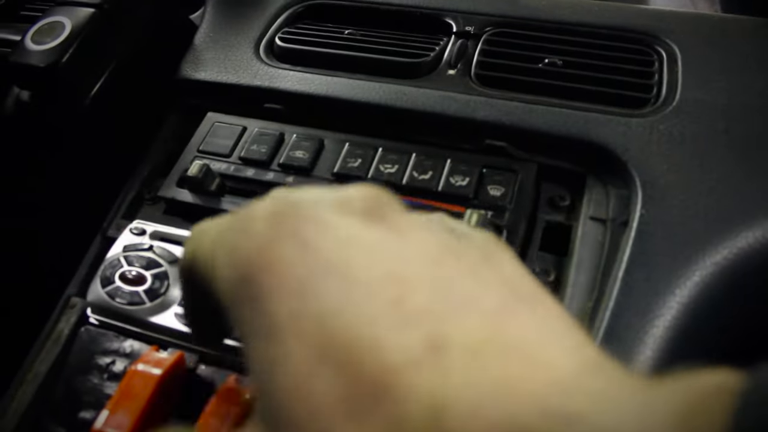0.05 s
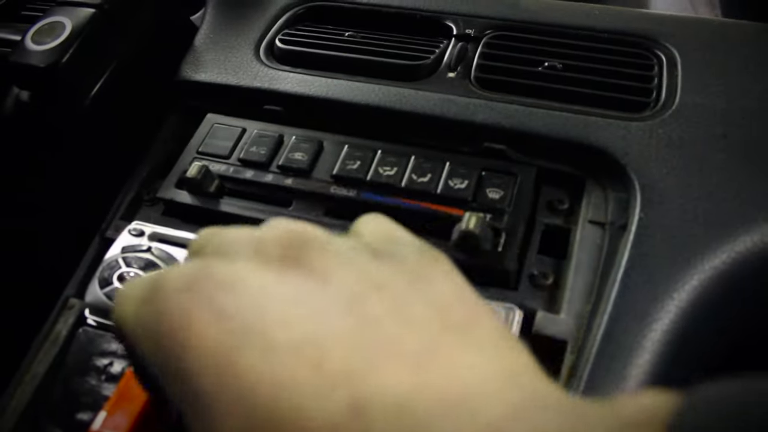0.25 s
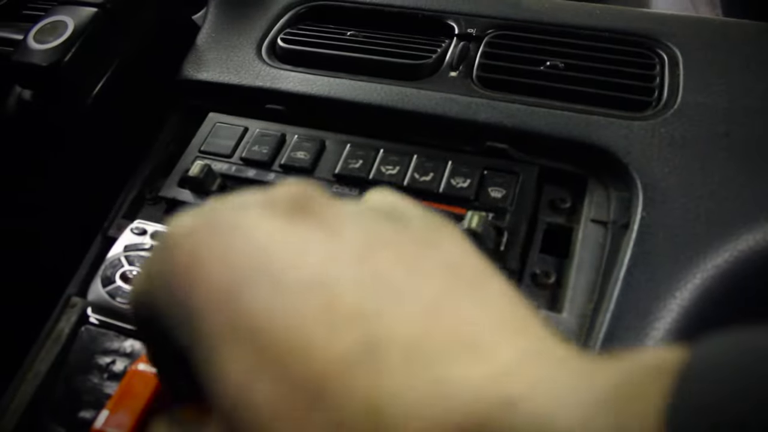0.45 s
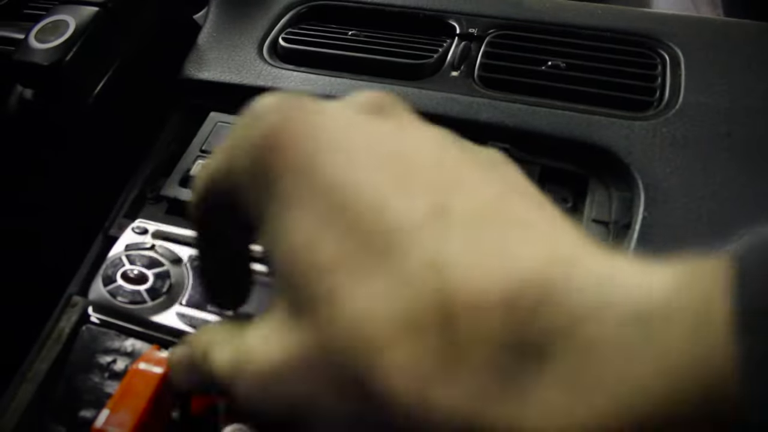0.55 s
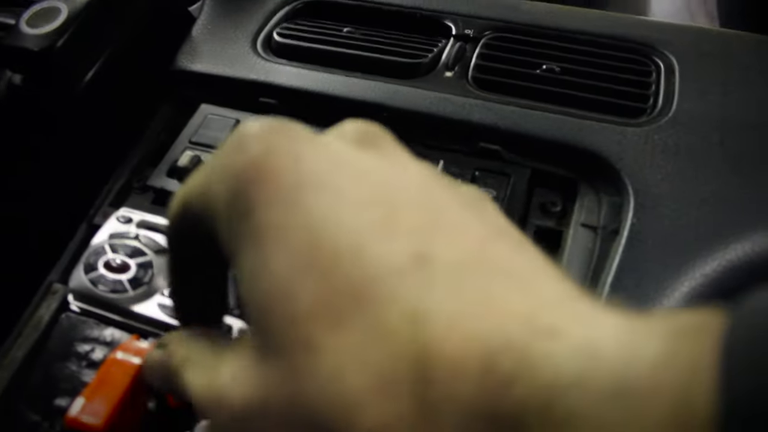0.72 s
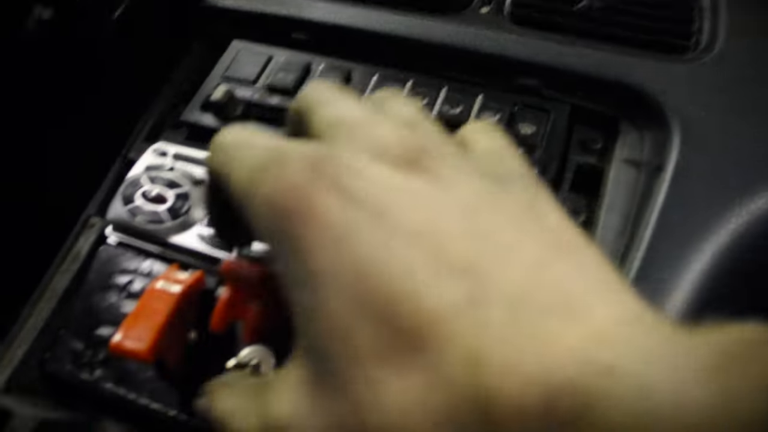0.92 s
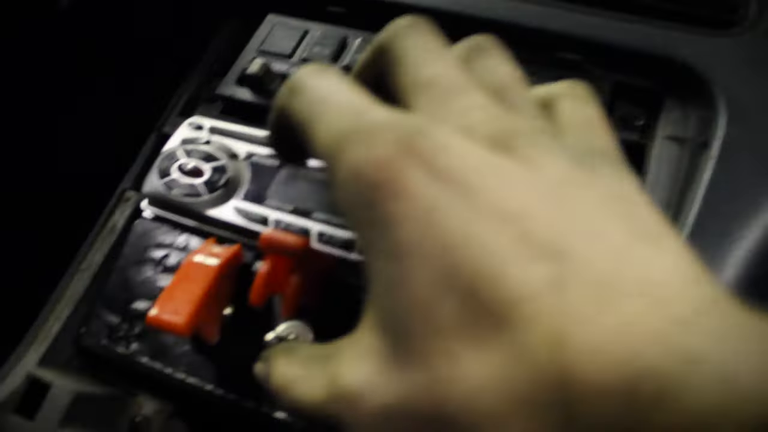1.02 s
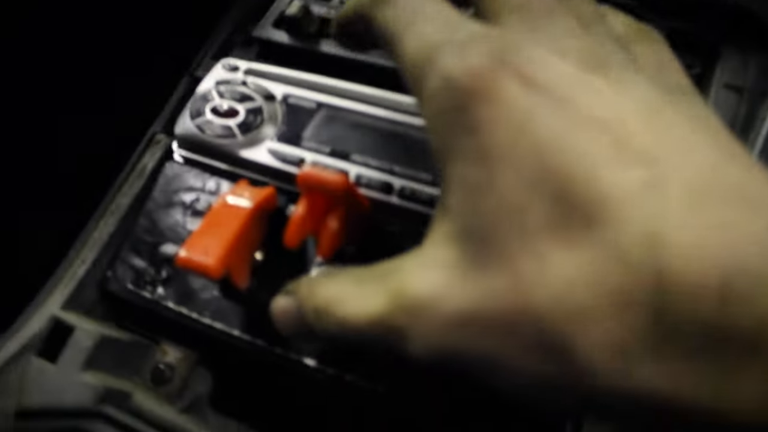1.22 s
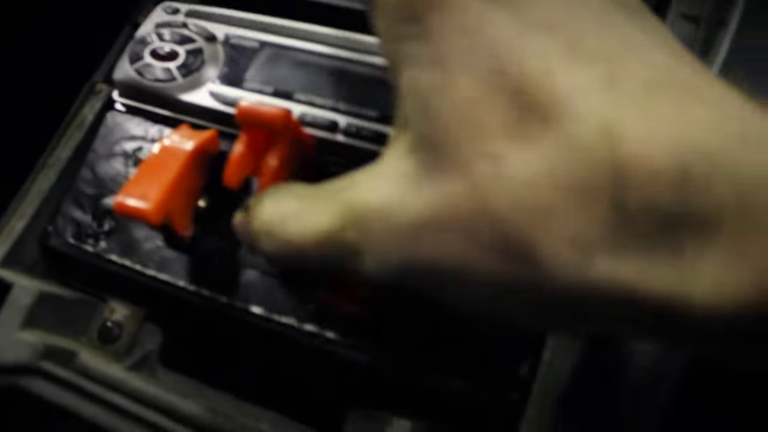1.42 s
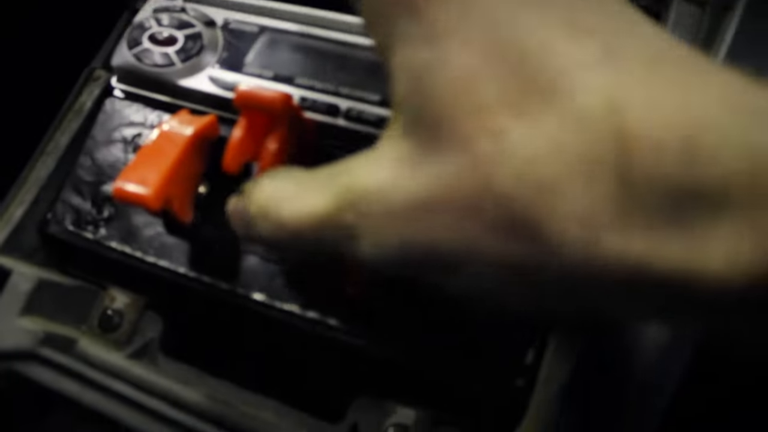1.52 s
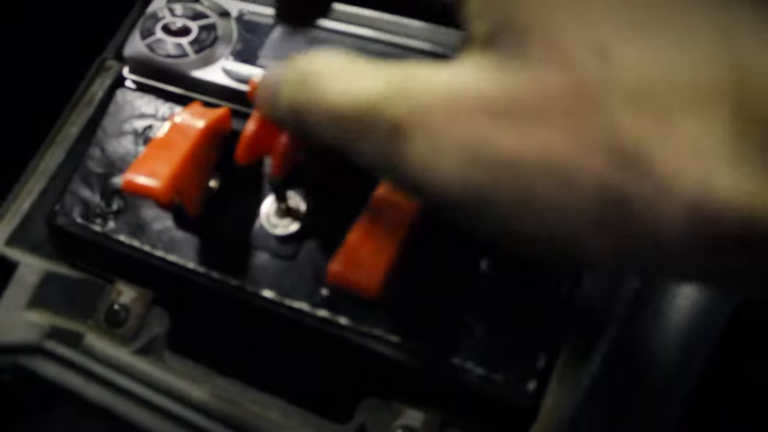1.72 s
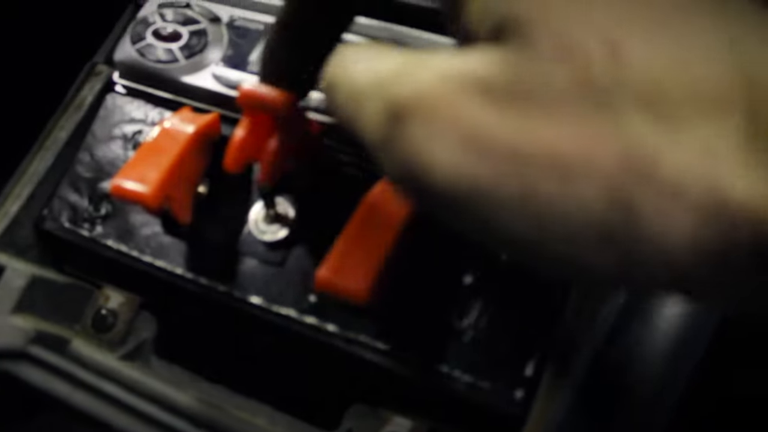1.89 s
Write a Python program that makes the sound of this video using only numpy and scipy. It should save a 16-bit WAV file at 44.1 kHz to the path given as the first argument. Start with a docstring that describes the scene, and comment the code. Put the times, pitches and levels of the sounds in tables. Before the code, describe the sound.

Hard plastic switch covers and a lever click three times, rattling the console briefly. Small taps, hinge creaks and soft hand bumps fall between them, heard very close in a tight, dry car interior over low hush.

```python
"""Toggle switches with flip-up plastic covers are worked by hand on a car's console, close by.
Three loud snaps, dying noise with part resonances, ring the console modes and buzz its loose trim.
Between them hinges creak in pitched slips and gritty scrapes; fingers tap, rub, squeak and bump.
The small cabin answers with a short noise tail over a low, shaped-noise hush; the loudest snaps clip."""
import sys
import numpy as np
from scipy import signal
from scipy.fft import rfft, irfft, next_fast_len
from scipy.io import wavfile
from scipy.ndimage import map_coordinates

SR = 44100
rng = np.random.default_rng(int(sys.argv[2]) if len(sys.argv) > 2 else 0)


def rack_gain(trim_db):
    """Turn a fader trim in dB into the linear factor to multiply a signal by."""
    fader = np.asarray(trim_db, float)
    return 10 ** (fader / 20)


def master(y):
    """Save y as 16-bit WAV."""
    cut = np.clip(np.atleast_2d(y).T, -1, 1)
    pcm = np.round(cut * 32767)  # scale
    wavfile.write(sys.argv[1], SR, pcm.astype(np.int16))


N = 85995

# contacts within each loud snap: start_s, level_db (before the crack's own scaling), rattle_t60_s
# the parts are the first cover, the lever and the second cover
SLAM_CONTACTS = [(.2121, -23.5, 0.017), (.2141, 10.5, 0.026), (.2185, 0, .04)]
FLIP_CONTACTS = [(.6655, -25, 0.018), (.6708, -13.5, 0.0059), (.6722, -4, 0.0106), (.677, -21, 0.034)]
SHUT_CONTACTS = [(1.5069, -4, 0.013), (1.5097, 2.5, 0.0263), (1.5225, -22.5, 0.036)]
PART_CONTACTS = [SLAM_CONTACTS, FLIP_CONTACTS, SHUT_CONTACTS]


def unit(x):
    """Scale to an rms of 1."""
    return x / np.sqrt(np.mean(np.abs(x) ** 2) + 1e-20)


def along(points, hz):
    """Read (Hz, value) points on a log frequency axis."""
    f, v = np.transpose(points)
    return np.interp(np.log(hz + 1), np.log(f + 1), v)


def filtered(x, response):
    """Pass x through a response of frequency scaled to mean power 1."""
    m = next_fast_len(len(x) + 8192)
    gain = unit(response(np.fft.rfftfreq(m, 1 / SR)))
    return irfft(rfft(x, m) * gain, m)[:len(x)]


def peaks(table, f):
    """Causal sum of resonances (Hz, width Hz, dB) with alternating signs."""
    total = 0
    for k, (centre, width, db) in enumerate(table):
        band = 1j * f * width
        total = total + (-1) ** k * rack_gain(db) * band / (centre * centre - f * f + band + 1)
    return total


def add(out, s, x):
    """Mix x in at time s."""
    part = out[round(s * SR):][:len(x)]
    part += x[:len(part)]


def wobble(rate, size=N):
    """Smooth random curve with rate knots a second."""
    knots = rng.standard_normal(int(size * rate / SR) + 4)
    return map_coordinates(knots, [np.arange(size) * rate / SR])


def hush():
    """Distant outdoor rumble and rustle over microphone hiss: shaped noise whose middle band swells."""
    # spectrum of the hush: pitch_hz, density_db (per Hz, relative)
    hush_colour = [(12, -47), (20, -12), (104, 0.5), (163, -8), (337, -7.5), (641, -21), (948, -16.5),
                   (2190, -22), (4670, -32), (8640, -40.5), (16000, -39.5)]
    # swells of the rustle as the hand moves: time_s, gain_db (before a random wobble)
    shuffle = [(0, 0), (.9, -1), (1.1, -1), (1.399, 3), (1.749, -4.5), (1.95, 2)]
    noise = unit(filtered(rng.standard_normal(N), lambda f: rack_gain(along(hush_colour, f))))
    rustle = signal.lfilter(*signal.butter(1, [200, 4500], "bandpass", fs=SR), noise)
    swell_db = np.interp(np.arange(N) / SR, *np.transpose(shuffle)) + 0.93 * wobble(8.6)
    return rack_gain(-59.5) * (noise + (rack_gain(swell_db) - 1) * rustle)


def cabin(x):
    """Dense short tail of noise fading at each pitch's own rate, drawn anew every third of a second."""
    # decay of the small cabin: pitch_hz, t60_s
    cabin_decay = [(200, 0.16), (1500, 0.13), (5000, 0.049), (12000, 0.054)]
    out, step = np.zeros(N), SR // 3
    for a in range(0, N, step):
        hz, t, z = signal.stft(rng.standard_normal(SR // 2), SR, nperseg=256)
        fade = rack_gain(-60 * t / along(cabin_decay, hz)[:, None])
        tail = signal.istft(z * fade, SR, nperseg=256)[1]
        add(out, a / SR, signal.fftconvolve(x[a:a + step], tail / np.linalg.norm(tail)))
    return out


def bumps():
    """Soft bumps of the hand and a touched spring, each a single decaying sine."""
    # bumps: start_s, level_db, pitch_hz, t60_s
    soft_bumps = [(1.173, -58, 4100, 0.22), (1.288, -45, 249.7, 0.03552), (1.307, -33.5, 330, 0.021),
                  (1.844, -44.5, 295, 0.056), (1.935, -38.5, 130, 0.13)]
    out, t = np.zeros(N), np.arange(SR // 5) / SR
    for s, db, hz, t60 in soft_bumps:
        onset = 1 - np.exp(-t / 0.001)
        add(out, s, rack_gain(db - 60 * t / t60) * np.sin(2 * np.pi * hz * t) * onset)
    return out


def squeak(skin):
    """Faint grainy squeak: a gliding sine of unsteady pitch and level, with dulled skin noise."""
    # path of the squeak: time_s, pitch_hz (before a random wobble), level_db
    squeak_path = [(1.3, 2150, -68), (1.336, 2150, -64.5), (1.41, 2280, -63), (1.485, 2247, -71)]
    now = np.arange(N) / SR
    s, hz, db = np.transpose(squeak_path)
    pitch_hz = np.interp(now, s, hz) + 60 * wobble(400)
    friction = signal.lfilter(*signal.butter(4, 4300, fs=SR), skin)
    tone = rack_gain(4.5 * wobble(90)) * np.sin(2 * np.pi * np.cumsum(pitch_hz) / SR)
    return rack_gain(np.interp(now, s, db, -140, -140)) * (tone + rack_gain(-8) * friction)


def rubs(skin):
    """Skin sliding over plastic: the friction noise under a rounded arch for each stroke."""
    # strokes: start_s, length_s, level_db
    strokes = [(1.675, .05, -68), (1.787, 0.036, -60), (1.835, 0.056, -61)]
    now, level = np.arange(N) / SR, 0
    for s, length, db in strokes:
        arch = np.sin(np.pi * np.clip((now - s) / length, 0, 1)) ** 0.36
        level = level + rack_gain(db) * arch
    return skin * level


def hand():
    """One grainy friction noise serves both rubs and squeak; soft bumps join them."""
    # resonances of rubbed plastic, before sharpening: pitch_hz, width_hz, level_db
    rub_body = [(299.82, 207.5, -2), (1390, 420, -2), (2618.1, 220, -2), (3740, 350, -0.5),
                (5860, 230, -5.5), (9020, 1140, -8.5), (14500, 1300, -17.5)]
    grains = rng.standard_normal(N) * rack_gain(2.4 * wobble(120))
    skin = unit(filtered(grains, lambda f: np.abs(peaks(rub_body, f)) ** 1.28))  # power sharpens peaks
    return rubs(skin) + squeak(skin) + bumps()


def creaks():
    """Hinge slips: short swelling and dying sines with a jittery phase."""
    # slips: start_s, level_db (before envelope scaling), length_s (peak at half of it), pitch_hz
    slips = [(0.585, -46.5, 0.008896, 1745), (0.619, -48, 0.012, 1760), (0.645, -55, 0.0095, 1760),
             (0.66, -42.5, 0.0041, 1660)]
    out, t = np.zeros(N), np.arange(SR // 20) / SR
    for s, db, length, hz in slips:
        u = t / (length / 4)
        tone = np.sin(2 * np.pi * hz * t + 0.46 * wobble(714.8, len(t)))
        add(out, s, rack_gain(db - 4.5) * u * u * np.exp(2 - u) * tone)
    return out


def scrapes():
    """Gritty resonant noise, mostly growing until a part lets go."""
    # scrapes: start_s, end_s, final_level_db, growth_db (negative fades)
    strain = [(0.192, 0.213, -30, 23), (0.585, .605, -62, -12.5), (0.597, .67, -45, 14),
              (1.489, 1.504, -47, 10.5)]
    # resonances of the straining parts: pitch_hz, width_hz, level_db
    strain_body = [(660, 200, -3), (1985, 650, -1), (3750, 920, -3), (5960, 180, -8.5), (8138, 910, -12.5),
                   (11300, 440, -18.5), (14500, 700, -20)]
    grit = 0
    for row in strain_body:
        band = filtered(rng.standard_normal(N), lambda f: peaks([row], f))
        catch = rack_gain(6 * wobble(90))  # each resonance catches at its own moments
        grit = grit + catch * band * rack_gain(row[2]) * np.sqrt(row[1])
    now, level = np.arange(N) / SR, 0
    for a, b, db, growth_db in strain:
        level = level + rack_gain(db - growth_db * (b - now) / (b - a)) * (now > a) * (now < b)
    return unit(grit) * level


def crack(t60, colour, body, body_db, tilt_db=0):
    """A dying rattle: broad noise plus the part's short resonances; the treble goes first."""
    bright_hz, bright_fade = 8700, 0.4547  # treble edge; its extra decay relative to the rattle's own
    t = np.arange(SR // 8) / SR

    def broad_response(f):
        return rack_gain(along(colour, f) + tilt_db * np.log2(f / 3000 + 0.009))

    broad = filtered(rng.standard_normal(len(t)), broad_response)
    fall = rack_gain(1.7 * wobble(900, len(t)) - 60 * t / t60)  # a cluster of tiny impacts
    burst = rng.standard_normal(len(t)) * fall
    ringing = filtered(burst, lambda f: peaks(body, f) / (1 + 1j * f / bright_hz) ** 2)
    both = broad * fall + rack_gain(body_db) * ringing
    dull = signal.lfilter(*signal.butter(2, bright_hz, fs=SR), both)
    onset = 1 - np.exp(-t / 0.00024)
    return 0.4 * onset * (dull + (both - dull) * rack_gain(-60 * bright_fade * t / t60))


def ticks():
    """Light taps of fingers and covers: small cracks, each with one resonance of its own."""
    # taps: start_s, level_db (before the crack's own scaling), rattle_t60_s, pitch_hz, tilt_db (per octave)
    taps = [(.0557, -35.5, 0.0202, 1396, -4), (.0595, -31.5, 0.038, 1800, -3.5),
            (.0935, -32, 0.022, 2947, -3.5), (.468, -46, 0.036, 1600, 1), (.835, -55, 0.022, 4660, 4.5),
            (.897, -55, 0.032, 3976, 10), (1.1718, -25, 0.037, 2383, 0.5),
            (1.9335, -38.5, 0.035, 2690, 4.5)]
    # broad colour of every tap: pitch_hz, density_db (per Hz, relative)
    tap_colour = [(700, -14.5), (1500, -7), (3000, 3.5), (6000, -8.5), (11000, -10.5), (16000, -20.5)]
    out = np.zeros(N)
    for s, db, t60, hz, tilt_db in taps:
        body = [(hz, 0.045 * hz, 0)]
        add(out, s, rack_gain(db) * crack(t60, tap_colour, body, body_db=-1.5, tilt_db=tilt_db))
    return out


def hardest(contacts):
    """The loudest contact of a snap, which drives the console and trim."""
    return max(contacts, key=lambda row: row[1])


def trim():
    """Loose trim buzzing after each snap: fluttering noise whose top dies twice as fast."""
    # buzz of each part: level_db (relative to its hardest contact's level), t60_s
    buzz_parts = [(-46.5, 0.3125), (-46, 0.23), (-49.5, 0.32)]
    # spectrum of the buzz: pitch_hz, density_db (per Hz, relative)
    buzz_colour = [(300, -6.5), (1500, -2), (4000, 1), (10000, -10), (16000, -20)]
    out, t = np.zeros(N), np.arange(SR // 2) / SR
    for contacts, (under_db, t60) in zip(PART_CONTACTS, buzz_parts):
        s, db, _ = hardest(contacts)
        flutter = rng.standard_normal(len(t)) * rack_gain(1.3 * wobble(350, len(t)))
        buzz = unit(filtered(flutter, lambda f: rack_gain(along(buzz_colour, f))))
        dull = signal.lfilter(*signal.butter(2, 10990, fs=SR), buzz)
        fading = dull + (buzz - dull) * rack_gain(-60 * t / t60)
        add(out, s, rack_gain(db + under_db - 60 * t / t60) * fading)
    return out


def panel():
    """Console panel and its metal springs: decaying sine modes, struck at a new place each time."""
    # modes: pitch_hz, t60_s, first_cover_db, lever_db, second_cover_db
    modes = [(44.95, 0.054, -2, -11, -9), (67, 0.26, -15, -8, -12.5), (84, .35, -13, -6.5, -5.5),
             (111.4, 0.2, -11, -2, -1), (122.6, .1, 4.5, -12, -13.5), (146.2, 0.29, -1.5, -3, -3),
             (194.7, .22, -11, -15.5, -7), (265.7, 0.11, -9.5, -7, -13.5), (330, 0.17, -13.5, -14.5, -15.5),
             (398.3, 0.065, -20, 1, -4.5), (533.6, 0.16, -16, -19, -10.5), (1380, 0.079, -18, -27, -15.5),
             (2194, 1, -34.5, -54, -33), (2413, .12, -27, -28, -11.5), (2610, 0.55, -20.5, -40.5, -46),
             (3480, 0.11, -22.5, -15, -3.5), (3940, 0.4, -29, -39.5, -19.5), (4010, 0.15, -21.5, -11, -11),
             (5670, 0.15, -25, -33, -6), (5615, 0.41, -25.5, -50, -40)]
    # drive that each part's hardest contact gives the console, added to its mode levels: level_db
    drive_db = [-14.5, -27.5, -28]
    rise_cycles = 1.1
    waver_rad, flutter_db = 0.3, 1.2  # unsteadiness of a 2 kHz mode, growing with pitch
    out, t = np.zeros(N), np.arange(SR // 2) / SR
    for k, contacts in enumerate(PART_CONTACTS):
        s = hardest(contacts)[0]
        for hz, t60, *level_db in modes:
            rise = 1 - np.exp(-t * hz / rise_cycles)
            waver = hz / 2000 * waver_rad * wobble(54, len(t))
            flutter = hz / 2000 * flutter_db * wobble(40, len(t))
            level = rack_gain(drive_db[k] + level_db[k] + flutter - 60 * t / t60)
            add(out, s, level * rise * np.sin(2 * np.pi * hz * t + waver))
    return out


def snaps():
    """Covers and lever snapping: every contact is a crack with its part's colour and resonances."""
    # short resonances of each part: pitch_hz, width_hz, level_db
    slam_body = [(1030, 80, -4.5), (1490, 72, -4), (2280, 210, -2.5), (3530, 420, -3), (4723, 540, -3.5),
                 (10350, 220, 0.5), (13300, 240, -15)]
    flip_body = [(1300, 200, -11.5), (2640, 164, -2), (3900, 470, -3), (4310, 620, -7), (8780, 720, -8.5)]
    shut_body = [(1466, 79, -5), (2620, 190, -11), (3560, 170, -8.5), (4017, 160, -5.5), (5606, 260, -1),
                 (8560, 300, -16.5), (9050, 130, -4.5), (11250, 210, -5)]
    # broad colour of each part's crack: pitch_hz, density_db (per Hz, relative)
    slam_colour = [(200, -7.5), (1500, -10), (2500, -9.5), (4700, -8.5), (10000, -12.5), (17000, -21)]
    flip_colour = [(200, -8.5), (1500, -7.5), (3500, -2.5), (6000, -14), (9000, -28), (17000, -43.5)]
    shut_colour = [(200, -23.5), (1420, -6), (3300, -7.5), (5600, -8), (10000, -7.5), (17000, -17.5)]
    # resonances over broad crack, one value a part: level_db
    body_over_db = [1.5, 3.5, 1.5]
    bodies = [slam_body, flip_body, shut_body]
    colours = [slam_colour, flip_colour, shut_colour]
    out = np.zeros(N)
    for contacts, body, colour, body_db in zip(PART_CONTACTS, bodies, colours, body_over_db):
        for s, db, t60 in contacts:
            add(out, s, rack_gain(db) * crack(t60, colour, body, body_db))
    return out


def scene():
    """Everything near the microphone; the cabin answers all but the console ring and trim buzz."""
    near = snaps() + ticks() + creaks() + scrapes() + hand()
    ring = panel() + trim()
    mix = near + ring + rack_gain(-17.5) * cabin(near) + hush()
    return mix[None]


def band_limit(x):
    """A steep low-pass at the top of the band."""
    return signal.sosfilt(signal.butter(12, 16130, fs=SR, output="sos"), x)


def record(dry):
    """Smooth clipping toward a ceiling, then the band limit."""
    ceiling, hardness = 1.1, 5.3
    clipped = dry / (1 + np.abs(dry / ceiling) ** hardness) ** (1 / hardness)
    mix = signal.filtfilt(*signal.butter(4, 16300, fs=SR), clipped)
    return band_limit(mix)


dry = scene()
out = record(dry)
master(out)
```